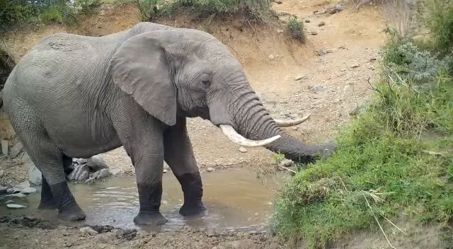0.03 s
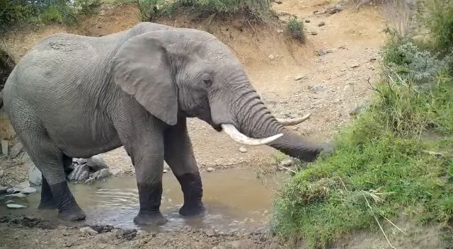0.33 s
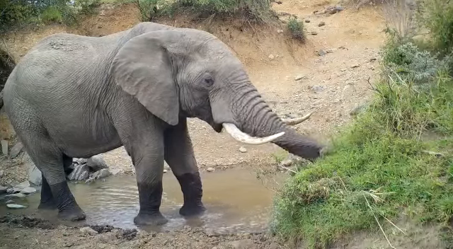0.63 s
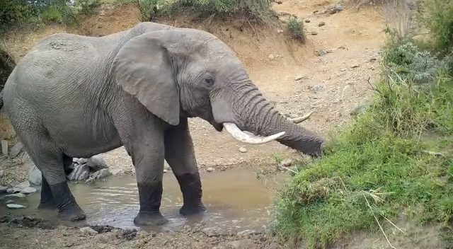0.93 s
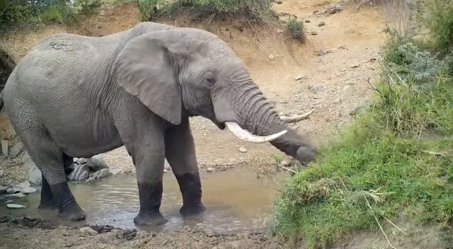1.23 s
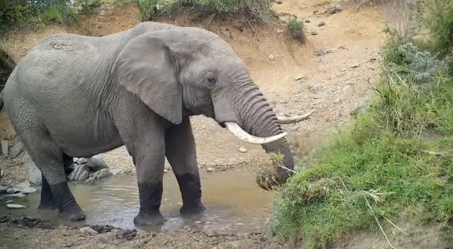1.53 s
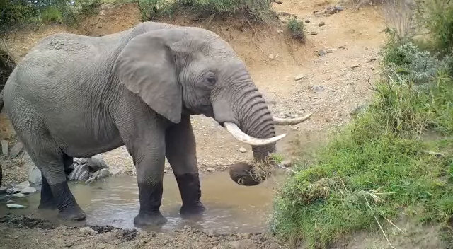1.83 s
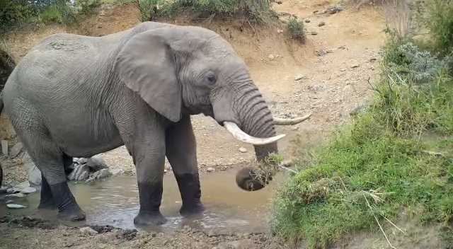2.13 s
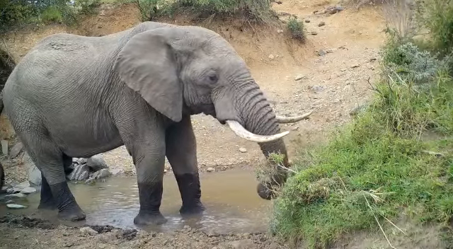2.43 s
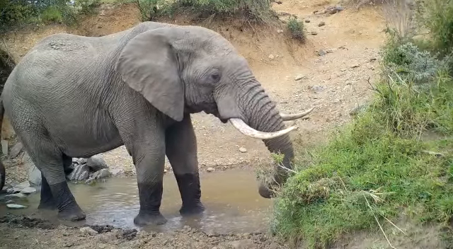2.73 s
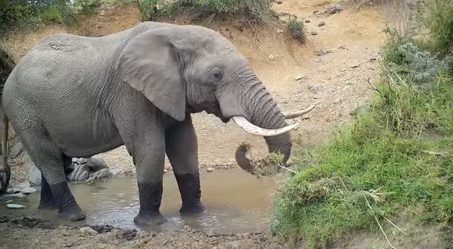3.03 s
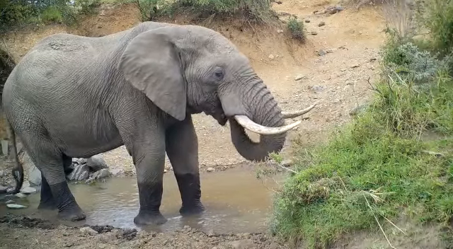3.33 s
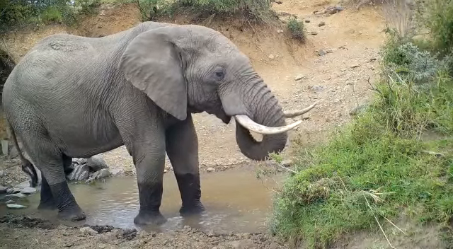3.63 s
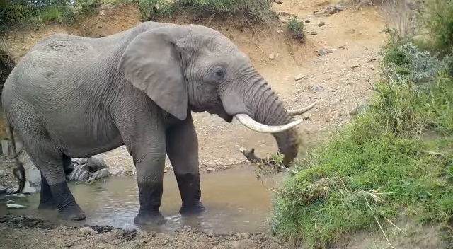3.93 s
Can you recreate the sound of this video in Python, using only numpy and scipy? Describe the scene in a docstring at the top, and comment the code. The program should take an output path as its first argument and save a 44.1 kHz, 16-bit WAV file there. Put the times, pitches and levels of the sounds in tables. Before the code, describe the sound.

An elephant rips out plants with crisp snaps and rustling leaves over a soft outdoor rush.

```python
"""Elephant tearing up a tuft

An elephant at a waterhole winds its trunk round leafy stems and rips them out of the bank: fibres
crackle, stems snap, leaves slide free, then the tuft is swished about. A distant bird pipes twice
over the steady rush of the bush; air bumps the microphone and the camera whines faintly."""
import sys
import numpy as np
from scipy import signal
from scipy.fft import rfft, irfft
from scipy.io import wavfile
from scipy.ndimage import uniform_filter1d

SR = 44100
rng = np.random.default_rng(int(sys.argv[2]) if len(sys.argv) > 2 else 0)


def transcribe(signal):
    """Save signal, clipped to [-1, 1], as a 16-bit WAV file at the path in sys.argv[1]."""
    frames = np.atleast_2d(signal).T
    limited = np.clip(frames, -1, 1)
    pcm = np.round(limited * 32767).astype(np.int16)
    wavfile.write(sys.argv[1], SR, pcm)


N = 176400

# tone of the distant water and foliage: f/Hz, level/dB
BUSH_EQ = [(25, -12), (70, -17.5), (130, -10.5), (250, -6.5), (400, -3), (650, 0.5), (1000, 1),
           (1500, -1.5), (2200, -4.5), (3200, -11), (4500, -21), (6500, -33), (9000, -39), (11000, -45)]
# envelope of the fibres tearing under the pull: t/s, relative level/dB
TEAR_ENVELOPE = [(0, -55), (.33, -51), (.53, -53), (.66, -46), (.72, -52), (.785, -40), (.818, -43.5),
                 (.84, -36.5), (.885, -47), (.957, -46), (1.0, -41), (1.06, -40.5), (1.125, -46.5),
                 (1.148, -38.5), (1.19, -43), (1.255, -37), (1.277, -48), (1.30, -37), (1.34, -39.5),
                 (1.44, -47), (1.55, -47), (1.59, -46.5), (1.68, -57), (1.92, -59.5), (2.1, -73),
                 (2.45, -59.5), (2.8, -71), (3.2, -76), (3.45, -65), (4, -85)]
# small crunches of the tuft in the trunk: t/s, relative level/dB
CRUNCH_HITS = [(1.918, -51), (2.416, -58), (3.435, -58), (3.665, -57)]
# woody tone of the stems: f/Hz, level/dB
STEM_EQ = [(150, -39.5), (500, -12), (1000, -15), (1400, -2), (1900, -0.5), (2400, -5.5), (3100, -9),
           (3700, -7), (4500, -29.5), (7000, -25), (11000, -49)]
# envelope of the sliding leaves: t/s, relative level/dB
SWISH_ENVELOPE = [(0, -55.5), (.55, -55), (.77, -50), (.95, -51), (1.0, -45.5), (1.12, -42.5),
                  (1.15, -39.5), (1.29, -41.5), (1.42, -40), (1.545, -45), (1.585, -39.5), (1.66, -53),
                  (1.78, -61.5), (2.3, -63), (2.38, -59.5), (2.42, -56.5), (2.455, -58.5), (2.55, -58),
                  (2.75, -72), (3.25, -71), (3.43, -56.5), (3.54, -67), (3.63, -62.5), (3.76, -74),
                  (4, -80)]
# bright tone of the leaves: f/Hz, level/dB
LEAF_EQ = [(400, -13.5), (1200, -5), (2200, 4.5), (3600, 1), (4700, -5), (5800, -6.5), (7500, -17.5),
           (9800, -24.5), (11000, -36)]
# air on the microphone: centre t/s, half length/s, top f/Hz, level/dB
AIR_PUFFS = [(0.053, 0.043, 60, -69.5), (1.3, 0.082, 122, -69.5), (1.443, 0.016, 120, -63),
             (1.68, 0.074, 90, -63), (1.709, 0.02, 135, -50.5), (1.855, 0.016, 70, -66),
             (2.972, 0.16, 85, -69)]
# breaking stems: t/s, relative level/dB, ring f/Hz, share of sharp crack/0-1
STEM_SNAPS = [(0.358, -36.5, 3170, 0.2), (.361, -40, 2400, .2), (0.615, -36.5, 2900, 0),
              (0.640, -40, 1880, 0), (.656, -31, 2070, 0.3), (0.665, -33, 2030, 0.1),
              (.732, -38, 2000, 0.1), (.746, -33.5, 1500, 0.1), (.7585, -32.5, 2740, 0.5),
              (0.777, -45, 2900, 0), (0.7803, -28, 1680, 0.05), (.7815, -35.5, 744, 0),
              (.791, -29, 1650, 0.07), (.801, -37.5, 1000, 0.25), (0.8284, -28, 2680, 0.3),
              (.829, -27, 1750, 0), (0.8303, -25, 1790, 0.14), (.8312, -36, 880, 0),
              (0.8362, -38, 2250, 0.1), (.8405, -32, 2400, 0), (0.8534, -29.5, 2020, 0.2),
              (0.8629, -33.5, 1890, 0.1), (0.9064, -34, 5360, 0), (.908, -29, 2310, 0.2),
              (.943, -38, 2200, .05), (.966, -31.5, 1700, 0), (.975, -34.5, 2970, 0.1),
              (0.9807, -36, 2500, .2), (0.9861, -21.5, 2440, 0.72), (0.9882, -26.5, 1820, 0.26),
              (1.0062, -30, 2100, 0.04), (1.01, -30, 1760, 0.15), (1.029, -36, 3020, 0),
              (1.0328, -22.5, 2160, 0.37), (1.0405, -29, 2300, 0.1), (1.0841, -36, 1110, 0),
              (1.109, -36, 1890, 0.1), (1.1392, -24.5, 1940, 0.3), (1.141, -34, 890, 0.4),
              (1.15, -32.5, 1930, .1), (1.1618, -30.5, 3380, 0.8), (1.198, -31, 1900, 0),
              (1.2125, -34, 2500, 0), (1.2295, -35, 3000, 0), (1.24, -34, 2500, 0.2),
              (1.2545, -28, 1630, 0.3), (1.2845, -25, 1690, 0), (1.3241, -33, 2200, 0.7),
              (1.33, -28, 2100, 0.44), (1.375, -33, 1850, 0), (1.424, -33, 3480, .3),
              (1.4426, -38, 5500, 0.8), (1.4909, -36.5, 3400, .2)]
# tone of a snap's ring, of its crack and of the bank's reverb: f/Hz, level/dB
RING_EQ = [(600, 4.5), (1500, 3.5), (6000, 0.5), (8000, -9), (11000, -11)]
CRACK_EQ = [(200, -23), (600, -15.5), (1700, -3), (3800, 2.5), (5000, -10), (8000, -14.5), (11000, -39)]
BANK_EQ = [(300, 8.5), (2000, 3), (5000, -1.5), (11000, 0)]
# bird notes: t/s, length/s, top f/Hz, level/dB
BIRD_NOTES = [(1.553, .032, 930, -50), (2.492, 0.089, 1026, -48)]


def undb(db):
    return 10 ** (np.asarray(db) / 20)


def unit(x):
    """Scale to rms 1."""
    return x / np.sqrt(np.mean(x ** 2) + 1e-20)


def envelope(points):
    """Gain ride through points of t/s, level/dB."""
    return undb(np.interp(np.arange(N) / SR, *np.array(points).T))


def eq(x, points):
    """Minimum-phase EQ through points of f/Hz, level/dB."""
    size = 4096
    hz, db = np.array(points).T
    gain = undb(np.interp(np.log(np.fft.rfftfreq(size, 1 / SR) + 1), np.log(hz), db))
    cepstrum = irfft(np.log(gain))
    cepstrum[1:size // 2] *= 2
    cepstrum[size // 2 + 1:] = 0
    return signal.fftconvolve(x, irfft(np.exp(rfft(cepstrum))))[:len(x)]


def wander(rate_hz):
    """Smooth random modulation, rms 1."""
    hold = int(SR / rate_hz)
    steps = np.repeat(rng.standard_normal(N // hold + 1), hold)
    return unit(uniform_filter1d(uniform_filter1d(steps, hold), hold)[:N])


def add(out, start_s, x):
    """Mix a sound in at its cue."""
    i = max(int(start_s * SR), 0)
    out[i:i + len(x)] += x[:N - i]


def crackle(per_octave_per_s, scatter_db, tone):
    """Tiny random fractures, each ringing briefly in its own band, a few far hotter than the rest."""
    out = np.zeros(N)
    for hz in 300 * np.sqrt(2) ** np.arange(11):  # octave-wide bands, half an octave apart
        strength = undb(np.minimum(scatter_db * rng.exponential(size=N), 11.5))
        fires = rng.random(N) < per_octave_per_s / 2 / SR
        clicks = fires * strength * rng.choice([-1, 1], N)
        band = signal.butter(2, [hz / np.sqrt(2), hz * np.sqrt(2)], "band", fs=SR, output="sos")
        out += signal.sosfilt(band, clicks)
    return unit(eq(out, tone))


def bush_rush():
    """Distant water and foliage: a smooth bed that barely swells and slowly eases."""
    swell_db, fade_db_per_s = 0.13, 0.31
    db = -51.5 + swell_db * wander(rate_hz=3.56) - fade_db_per_s * np.arange(N) / SR
    return undb(db) * unit(eq(rng.standard_normal(N), BUSH_EQ))


def camera_whine():
    """A thin electrical tone whose phase flips, a little unevenly, at every picture frame."""
    whine_hz, frame_hz, slip_rad = 7796.5, 59.5, 0.36
    t = np.arange(N) / SR
    frame = (t * frame_hz).astype(int)
    phase = np.pi * frame + slip_rad * rng.standard_normal(frame[-1] + 1)[frame]
    return undb(-71.5) * unit(np.sin(2 * np.pi * whine_hz * t + phase))


def fibre_tear():
    """Fibres give way in quick uneven jerks; the loose tuft crunches now and then."""
    crunch_half_s = 0.0072
    t = np.arange(N) / SR
    pull = envelope(TEAR_ENVELOPE) * undb(1.7 * wander(rate_hz=110))
    for centre, db in CRUNCH_HITS:
        pull += undb(db) * np.exp(-((t - centre) / crunch_half_s) ** 2)
    return undb(-0.5) * pull * crackle(per_octave_per_s=650, scatter_db=4, tone=STEM_EQ)


def leaf_swish():
    """Leaf slides on leaf in a fluttering wash of dense, bright grains."""
    slide = envelope(SWISH_ENVELOPE) * undb(1.23 * wander(rate_hz=49.54))
    return undb(-1) * slide * crackle(per_octave_per_s=3000, scatter_db=3.5, tone=LEAF_EQ)


def air_bumps():
    """Puffs of air hit the microphone as soft swells of low rumble."""
    out, t = np.zeros(N), np.arange(N) / SR
    for centre, half_s, top_hz, db in AIR_PUFFS:
        swell = np.exp(-0.5 * ((t - centre) / half_s) ** 2)
        low_band = signal.butter(3, [30, top_hz], "band", fs=SR, output="sos")
        puff = swell * signal.sosfilt(low_band, rng.standard_normal(N))
        out += undb(db) * puff * np.sqrt(np.sum(swell ** 2) / np.sum(puff ** 2))
    return out


def bank_reverb(x):
    """The direct sound, one bounce off the ground and a short, dull scatter from the earth bank."""
    t60_s, attack_s, ground_lag_s = 0.42, 0.00097, 0.00164
    t = np.arange(SR // 2) / SR
    tail = eq(rng.standard_normal(len(t)), BANK_EQ) * undb(-60 * t / t60_s)
    tail *= 1 - np.exp(-t / attack_s)
    tail *= undb(-11) / np.sqrt(np.sum(tail ** 2))
    out = x + signal.fftconvolve(x, tail)[:N]
    bounce = signal.lfilter(*signal.butter(1, 3000, fs=SR), x)
    add(out, ground_lag_s, undb(-24) * bounce)
    return out


def stem_snaps():
    """Each stem breaks with a crack and a spray of splinters that ring it for a millisecond or so."""
    splinter_decay_s, energy_span_s = 0.0012, 0.00088
    out, t = np.zeros(N), np.arange(SR // 50) / SR
    crack = unit(eq(1.0 * (t == 0), CRACK_EQ))
    for start, db, hz, sharpness in STEM_SNAPS:
        force = 0.37 * rng.standard_normal(len(t)) * np.exp(-t / splinter_decay_s)
        force[0] += 2  # the break itself
        width_hz = min(0.66 * hz, 2300)
        stem = signal.iirpeak(hz, hz / width_hz, SR)
        ring = signal.lfilter(*stem, signal.lfilter(*stem, force))
        snap = (1 - sharpness) * unit(eq(ring, RING_EQ)) + sharpness * crack
        snap *= np.sqrt(SR * energy_span_s / np.sum(snap ** 2))
        add(out, start, undb(db + 2) * snap)
    return out


def bird_pipes():
    """Short, almost pure notes that swell as their pitch arches, each with a faint echo."""
    arch, roughness = 0.099, 0.0065  # shares of the pitch
    attack, release = 0.5, 0.054  # shares of the length
    out, echo_s = np.zeros(N), 0.023
    for start, length, hz, db in BIRD_NOTES:
        progress = np.linspace(0, 1, int(length * SR))
        jitter = roughness * wander(rate_hz=310)[:len(progress)]
        pitch = hz * (1 - arch * (2 * (progress - 0.49)) ** 2 + jitter)
        swell = np.clip(np.minimum(progress / attack, (1 - progress) / release), 0, 1)
        note = undb(db) * unit(swell * np.sin(2 * np.pi * np.cumsum(pitch) / SR))
        add(out, start, note)
        add(out, start + echo_s, undb(-13) * note)
    return out


def low_thud():
    """One soft, dull knock."""
    centre_s, half_s, hz = 1.6995, 0.003, 255
    t = np.arange(N) / SR - centre_s
    return undb(-39) * np.exp(-(t / half_s) ** 2) * np.sin(2 * np.pi * hz * t)


def scene():
    """Mono mix; only the snaps, tear and swish feed the reverb."""
    tuft = bank_reverb(stem_snaps() + fibre_tear() + leaf_swish())
    return (tuft + bird_pipes() + bush_rush() + low_thud() + air_bumps() + camera_whine())[None]


def record(dry):
    """The camera cuts the top end steeply above 11 kHz."""
    return signal.sosfilt(signal.ellip(10, 0.2, 70, 11000, fs=SR, output="sos"), dry)


dry = scene()
out = record(dry)
transcribe(out)
```